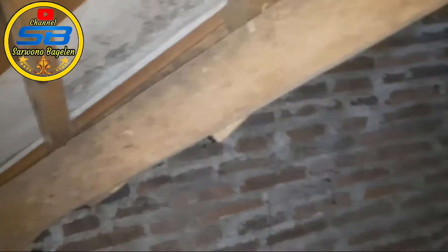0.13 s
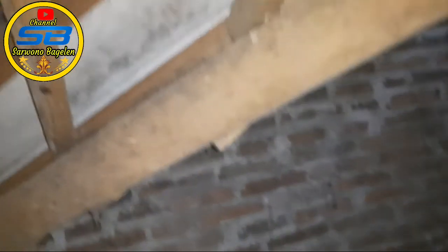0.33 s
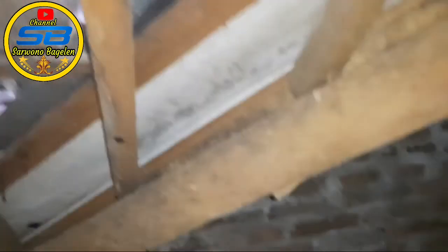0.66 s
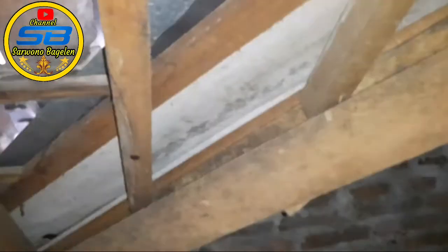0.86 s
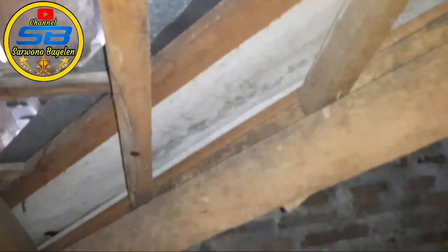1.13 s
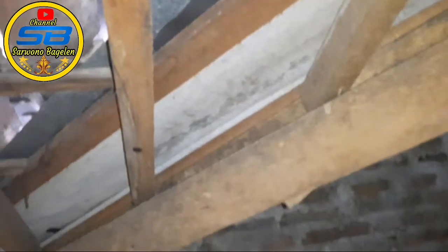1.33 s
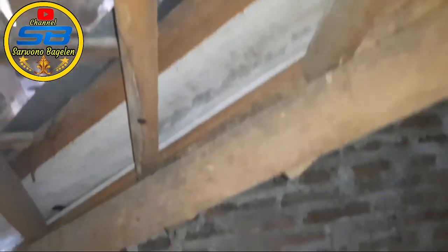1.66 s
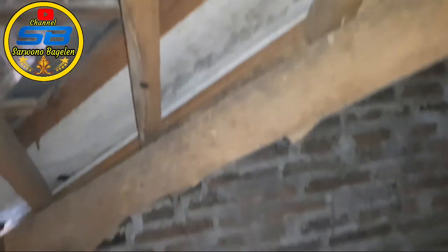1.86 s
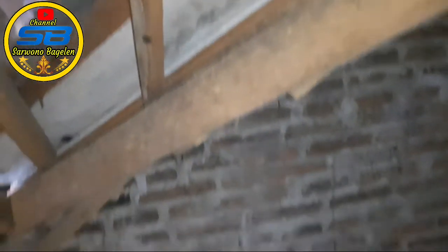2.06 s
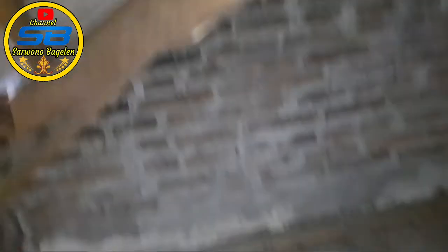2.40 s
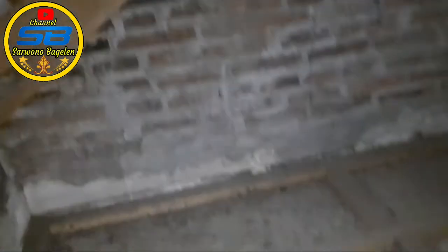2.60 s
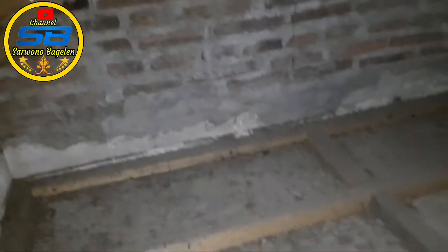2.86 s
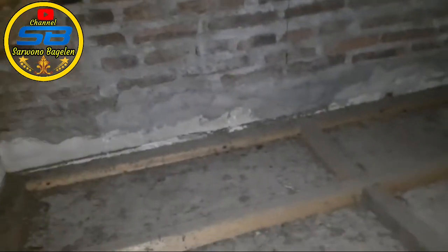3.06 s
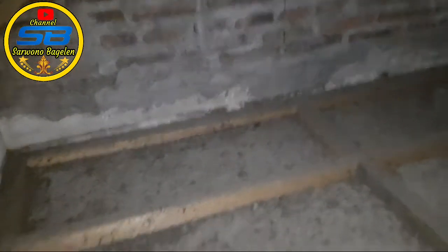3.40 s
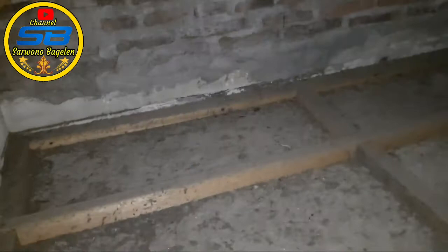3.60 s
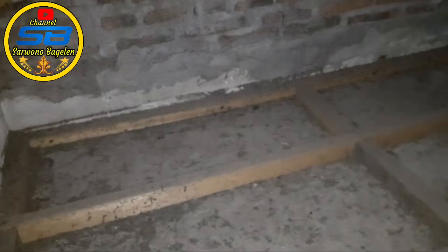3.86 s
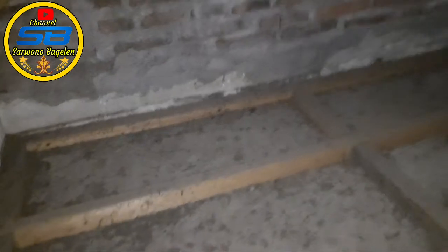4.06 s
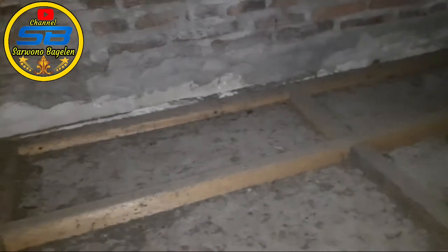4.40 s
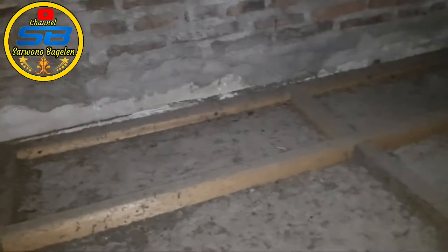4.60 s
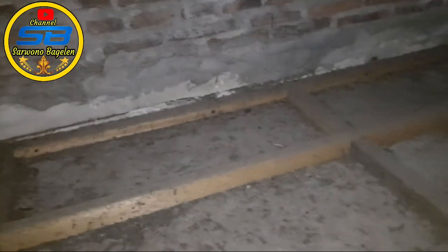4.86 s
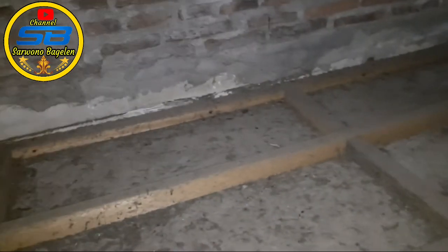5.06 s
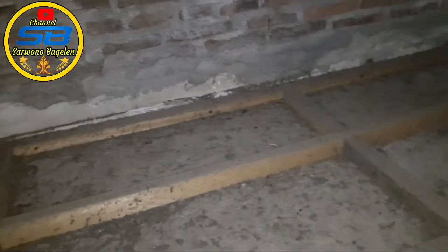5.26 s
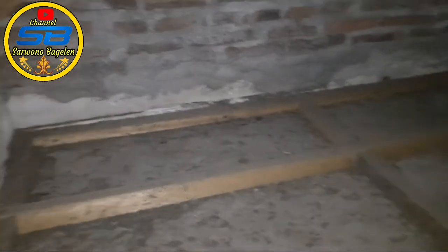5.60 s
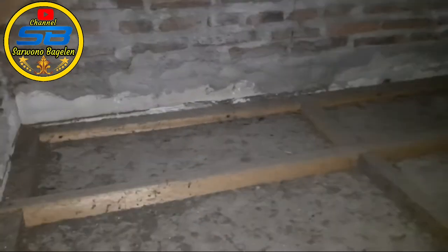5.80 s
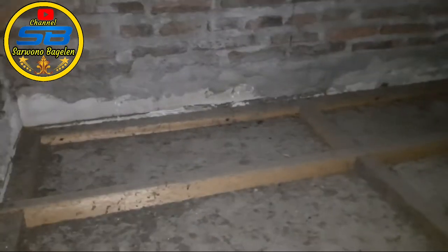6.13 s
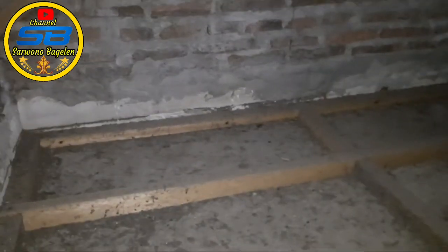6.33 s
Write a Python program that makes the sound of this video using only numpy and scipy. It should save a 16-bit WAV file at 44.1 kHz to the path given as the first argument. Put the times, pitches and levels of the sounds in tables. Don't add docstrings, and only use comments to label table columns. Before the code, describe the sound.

Overlapping thin kitten mews and squeaks under a roof, faint chicks outside, someone shifting on joists, and a single loud crack against the recorder.

```python
import sys
import numpy as np
from scipy import signal
from scipy.fft import rfft, irfft, next_fast_len
from scipy.io import wavfile

SR = 44100
rng = np.random.default_rng(int(sys.argv[2]) if len(sys.argv) > 2 else 0)


def unload_audio(sound):
    columns = np.transpose(np.atleast_2d(sound))
    steps = np.round(np.clip(columns, -1, 1) * 32767)
    wavfile.write(sys.argv[1], SR, steps.astype(np.int16))


def voltage_ratio(decibels):
    exponent = np.asarray(decibels, float) / 20
    return 10 ** exponent


N = 284445


def at_hz(points, hz):
    point_hz, value = np.transpose(points)
    return np.interp(np.log(hz), np.log(point_hz), value)


def drift(rate_hz, size=N):
    r = np.exp(-16 * np.pi * rate_hz / SR)
    settle = 800
    white = rng.standard_normal(size // 8 + settle + 2)
    slow = signal.lfilter([1], [1, -2 * r, r * r], white)[settle:]
    unit = np.sqrt((1 - r * r) ** 3 / (1 + r * r))
    return unit * np.interp(np.arange(size) / 8, np.arange(len(slow)), slow)


def ring(clicks, hz, t60_s):
    r, w = voltage_ratio(-60 / (t60_s * SR)), 2 * np.pi * hz / SR
    return signal.lfilter([0, np.sin(w)], [1, -2 * r * np.cos(w), r * r], clicks + 1e-18)


def pan(db):
    return voltage_ratio(db * np.array([[.5], [-.5]]))


def add(out, start_s, sound, pan_db, lag_ms=0.):
    n = np.arange(sound.shape[1])
    sound = pan(pan_db) * sound * np.clip(np.minimum(n, n[::-1]) / (0.0069 * SR), 0, 1)
    for side, sign in enumerate([.5, -.5]):
        at = round((start_s + .001 + sign * lag_ms / 1000) * SR)
        out[side, at:at + len(n)] += sound[side, :N - at]


def banded_noise(spectrum, patchy_db, grain_db=0.):
    # frequency in Hz, left-right likeness -1 to 1.
    likeness = [(60, 0.97), (240, 0.87), (950, 0.19), (3770, -0.55), (15000, -0.24)]
    # frequency in Hz, L-R level in dB.
    leaning = [(60, -4), (150, -2), (380, -3), (950, 1.5), (2380, -7.5), (5980, -1), (15000, 9.5)]
    points = np.array(spectrum)
    points = points[points[:, 1] > -45]
    low_hz, high_hz = points[0, 0], min(points[-1, 0], 19000)
    edges = low_hz * 2 ** np.arange(0, np.log2(high_hz / low_hz) + .3, .5)
    white = rng.standard_normal((2, 2, N), dtype=np.float32)
    white = white * voltage_ratio(grain_db * drift(300))
    out, together = 0, drift(5.54)
    for k, (low, high) in enumerate(zip(edges, edges[1:])):
        band = signal.butter(2, [low, high], "band", fs=SR, output="sos")
        mid, side = signal.sosfilt(band, white[k % 2])
        hz = np.sqrt(low * high)
        alike = np.clip(at_hz(likeness, hz), 0, 1)
        gain = voltage_ratio(at_hz(spectrum, hz) + patchy_db * (1.43 * together + drift(12.5)))
        pair = np.sqrt(1 + alike) * mid + np.sqrt(1 - alike) * side * [[1], [-1]]
        out = out + gain * pan(at_hz(leaning, hz)) * pair
    return out / np.std(out.mean(axis=0))


def strokes(rows):
    rise_db_per_s, die_db_per_s = 284.5, 181
    s, length, *levels = np.transpose(rows)[:, :, None]
    t = np.arange(0, N + 64, 64) / SR
    shape_db = -rise_db_per_s * np.maximum(s - t, 0) - die_db_per_s * np.maximum(t - s - length, 0)
    gains = [np.sqrt(np.sum(voltage_ratio(level + shape_db) ** 2, axis=0)) for level in levels]
    return [np.interp(np.arange(N) / SR, t, gain) for gain in gains]


def voiced(rows, hoarse, blur_hz):
    s, hz, *levels = np.transpose(rows)
    t = np.arange(s[0], s[-1], 1 / SR)
    pitch = np.interp(t, s, hz) * (1 + 0.0016 * drift(31, size=len(t)))
    hoarse = np.clip(hoarse, 0, 1)
    random = drift(blur_hz, size=len(t)) + 1j * drift(blur_hz, size=len(t))
    flutter = np.sqrt(1 - hoarse) + np.sqrt(hoarse / 2) * random
    phase = 2 * np.pi * np.cumsum(pitch) / SR
    return phase, [np.interp(t, s, v) for v in levels], flutter * np.sqrt(2)


def fading(size, depth):
    waver = [drift(12, size=size) + 1j * drift(12, size=size) for side in range(2)]
    return (1 + depth * np.array(waver)) / np.sqrt(1 + 2 * depth ** 2)


def shifting_weight():
    # time in seconds, level in dB.
    shifting = [(0.0, -56), (0.54, -56.5), (0.92, -52.5), (1.51, -60.5), (1.69, -60), (1.9, -55),
                (2.77, -61), (3.07, -61), (3.34, -64.5), (3.52, -66.5), (3.75, -73.5), (3.95, -62),
                (4.37, -63), (4.72, -60.5), (5.48, -62.5), (5.86, -60), (6.07, -65), (6.45, -60)]
    s, level_db = np.transpose(shifting)
    return np.interp(np.arange(N) / SR, s, level_db)


def scuff_strokes():
    # start in seconds, length in seconds, body in dB, grit in dB, dust over the grit in dB.
    contacts = [(0.243, 0.19, -61.5, -71.5, -7.5), (1.011, 0.065, -53.5, -75.5, -0.5),
                (1.275, 0.098, -55.5, -83.5, -1), (1.695, 0.03, -60.5, -106, -9),
                (1.949, 0.074, -63, -64.5, -6), (2.08, 0.35, -58, -68, -15), (2.633, 0.0092, -57.5, -91, 1),
                (2.799, 0.039, -62.5, -80.5, -22), (3.478, 0.22, -73.5, -80.5, -16),
                (3.754, 0.28, -63.5, -79.5, -1.5), (4.431, 0.16, -71, -78, -16),
                (4.816, 0.076, -67, -70.5, -15), (5.04, 0.038, -69, -93.5, 8),
                (5.395, 0.051, -70, -82, 2.5), (5.6, 0.035, -72, -88.5, -18), (5.87, .03, -93, -96, -13.5),
                (6.402, 0.055, -80, -90, -17)]
    return strokes([(s, length_s, body_db, grit_db, grit_db + dust_db)
                    for s, length_s, body_db, grit_db, dust_db in contacts])


def joist_rumble(weight_db, body):
    # frequency in Hz, density in dB per Hz.
    boom = [(18, -39), (30, -12), (97, 1), (185, -13.5), (227, -18), (260, -10.5), (407, -34), (461, -28),
            (767, -53.5), (1200, -44), (1560, -76), (2640, -120)]
    return np.hypot(voltage_ratio(weight_db + 4.0), body) * banded_noise(boom, patchy_db=2.5)


def recorder_hiss():
    # frequency in Hz, density in dB per Hz.
    self_noise = [(530, -35), (900, -6.5), (1400, -3.5), (2230, -8.5), (3160, -8.5), (6180, -8.5),
                  (8030, -9.5), (9270, -9), (10600, -9.5), (14600, -12), (15700, -17)]
    return voltage_ratio(-82.5) * banded_noise(self_noise, patchy_db=.3)


def kittens():
    # time in seconds, pitch in Hz, effort in dB, mouth opening 0-1.
    long_mew = [(0.0, 791, -63, 0.48), (0.17, 802.7, -62, 0.5), (0.19, 784, -71.5, 0.45),
                (0.3, 750.6, -62.5, 0.49), (0.41, 790.5, -60.5, .55), (0.435, 815, -66, 0.41),
                (0.535, 834, -67.5, 0.4), (.555, 874, -64, 0.58), (0.645, 876, -66, 0.64)]
    long_mew_again = [(0.655, 908, -55.5, 0.41), (.7, 896, -59.5, 0.42), (0.76, 857, -60, 0.54),
                      (.81, 886.5, -56.5, 0.48), (0.858, 903, -53, 0.43), (.91, 910, -55, 0.57),
                      (0.968, 896, -58, 0.42), (1.0, 853, -53.5, 0.73)]
    high_mew = [(0.262, 1570, -80, 0.66), (0.285, 1695, -65.5, 0.88), (0.308, 1762, -61.5, 0.87),
                (0.345, 1774, -61, 0.87), (0.381, 1742, -61, 0.88), (.43, 1520, -62, 0.7),
                (0.485, 1320, -64.5, 0.63), (.56, 1153, -70, 0.5), (0.659, 971, -66.5, 0.13)]
    flat_mew = [(3.33, 976, -87, 0.67), (3.412, 1103, -77, 0.49), (3.61, 1110, -64, 0.33),
                (3.662, 1095, -60.5, 0.31), (3.89, 988, -61.5, 0.27)]
    arch_mew = [(3.53, 587, -88, 0.3), (3.601, 737, -73.5, 0.6), (3.651, 820.5, -68.5, 0.47),
                (3.71, 839, -67, 0.64), (3.77, 800, -60, 0.52), (3.82, 737, -61, 0.52),
                (3.86, 645, -69, 0.4), (3.9, 588, -81, 0.47)]
    rising_mew = [(4.38, 1024, -80.5, 0.4), (4.416, 1054, -77, 0.41), (4.46, 1225, -79.5, 0.83),
                  (4.5, 1220, -68.5, 0.52), (4.545, 1279, -71.5, 0.75), (4.6, 1290, -64, 0.57),
                  (4.651, 1302, -64.5, 0.54), (4.72, 1190, -73, 0.59), (4.799, 1108, -80, 0.7)]
    falling_mew = [(4.53, 702, -78, 0.47), (4.575, 807, -68.5, 0.28), (4.642, 784.5, -59, 0.5),
                   (4.716, 756.4, -62.5, 0.62), (4.775, 737, -59, 0.6), (4.87, 646, -63, 0.71),
                   (4.92, 574, -66.5, 0.51), (4.969, 552.5, -66.5, 0.24), (5.02, 487, -72.5, 0.15)]
    over_mew = [(1.93, 1165, -77.5, 0.49), (1.97, 1300, -74, 0.5), (2.03, 1474, -63.5, 0.61),
                (2.082, 1462, -73, 0.7), (2.132, 1383, -61, 0.61), (2.19, 1392, -74.5, 0.73),
                (2.244, 1364, -62.5, 0.56), (2.3, 1345, -64, 0.55)]
    long_mew_end = [(1.001, 816, -56.5, 0.47), (1.03, 825, -56, 0.4), (1.065, 826, -61, 0.56),
                    (1.099, 856, -60.5, 0.67), (1.14, 821, -62, .5), (1.16, 814.5, -60, 0.41),
                    (1.215, 799.6, -63, 0.59), (1.26, 746, -69, 0.42), (1.31, 600, -88, 0.1)]
    # the same, then edge of the strained upper partials in dB.
    loud_mew = [(1.861, 619, -75.5, 0.29, -98), (1.924, 947, -63, 0.69, -78.5),
                (1.978, 1093, -47.5, 0.9, -67), (2.016, 1132, -54.5, 0.65, -63),
                (2.07, 1117, -52.5, 0.58, -66.5), (2.147, 1024, -42.5, 0.41, -79),
                (2.216, 941, -52.5, 0.34, -70), (2.28, 831, -60.5, 0.27, -82), (2.36, 687, -68, 0.07, -90)]
    mews = [long_mew, long_mew_again, high_mew, loud_mew, flat_mew, arch_mew, rising_mew, falling_mew,
            over_mew, long_mew_end]
    # mouth resonance sharpness, fall per partial in dB, wall echo lag in ms, echo share 0-1.
    throats = [(3.86, -7, 6.05, 0.31), (1.97, -1.5, 6.06, 0.19), (3.9, -4.5, 5.1, 0.33),
               (4.83, -3.5, 5.1, 0), (1.6, -4, 4.5, 0.36), (2.86, -2.5, 5.8, 0.44), (2.06, -4.5, 6.4, 0),
               (1.95, -2, 4.8, 0.18), (1.9, -1, 5.14, 0.24), (2.36, -2, 9.3, 0.24)]
    # hoarse share 0-1, partial 4 re effort in dB, fall per higher partial in dB, L-R in dB,
    # left lag in ms.
    voices = [(.05, -41, -8, -3, -.2), (.05, -41, -8, -3, -.2), (.05, -19, -2, -6, -.2),
              (.02, 0, -6.5, -4, -.14), (.08, -32, -8, 1, -.18), (.06, -29, -8, -1, -.2),
              (.14, -30, -8, -1, -.1), (.06, -22, -16, -4, -.2), (.15, -3, -1, 2, -.1),
              (.05, -41, -8, -3, -.2)]
    # sound bypassing the mouth resonance in dB, wavering of the path 0-1.
    paths = [(-10, 0.4), (-20, 0.32), (-14.5, 0.38), (2.5, 0.37), (-12, 0.74), (-21, 0.51), (-12, 0.66),
             (-10, 0.49), (-9.5, .34), (-12, 0.37)]
    break_up_s = [.02, .005, .07, .07, .07, .07, .07, .07, .07, .07]
    # frequency in Hz, mouth colour on the upper partials in dB.
    mouth_colour = [(2000, 0), (4500, 5), (5300, 2), (5700, 8), (6600, -7), (7200, 1), (8800, 5),
                    (10200, -15), (15000, -24)]
    shut_hz, mouth_octaves = 1000, 2

    out = np.zeros((2, N))
    for rows, throat, voice, path, break_s in zip(mews, throats, voices, paths, break_up_s):
        sharp, slope_db, echo_ms, echo = throat
        hoarse, fourth_db, fall_db, pan_db, lag_ms = voice
        bypass_db, waver = path
        phase, (effort_db, mouth, *edge_db), flutter = voiced(rows, hoarse, blur_hz=107)
        breathy = voiced(rows, hoarse=.15, blur_hz=170)[2]
        breath = voiced(rows, hoarse=1, blur_hz=200)[2]
        spent = np.clip(1 - np.arange(len(phase))[::-1] / (break_s * SR), 0, 1)
        flutter = (1 - spent) * flutter + .7 * spent * breath
        pitch = np.gradient(phase) * SR / (2 * np.pi)

        resonance_hz = shut_hz * 2 ** (mouth_octaves * mouth)
        over = [k * pitch / resonance_hz for k in (1, 2, 3)]
        tract = [20 * np.log10(1 / ((1 - r ** 2) ** 2 + (r / sharp) ** 2) + voltage_ratio(bypass_db)) for r in over]
        levels = [effort_db + k * slope_db + tract[k] - tract[0] for k in range(3)]
        effort = np.maximum(levels[1] - 6, levels[2])
        bloom = effort.max() + 1.3 * (effort - effort.max()) + 22 * (mouth - mouth.max())
        bloom = edge_db[0] if edge_db else bloom
        levels += [bloom + fourth_db + k * fall_db + at_hz(mouth_colour, (k + 4) * pitch) for k in range(6)]

        partials = []
        for k, level in enumerate(levels):
            echo_turn = np.exp(-2j * np.pi * (k + 1) * pitch * echo_ms / 1000)
            wall = (1 + echo * echo_turn) / np.sqrt(1 + echo ** 2)
            line = voltage_ratio(level) * wall * np.exp(1j * (k + 1) * phase)
            partials.append(line * fading(len(phase), depth=waver * (1 + (k > 2))))
        sound = flutter * sum(partials[:3]) + breathy * sum(partials[3:])
        add(out, rows[0][0], sound.real, pan_db, lag_ms)
    return out


def squeaks():
    # start in seconds, length in seconds, first Hz, last Hz, peak in dB.
    glides = [(0.215, .07, 3300, 4500, -61), (2.606, 0.26, 3320, 3190, -64), (2.84, 0.29, 2150, 2230, -58),
              (2.86, 0.165, 1190, 1330, -65), (3.043, 0.3, 2770, 2711, -64), (3.17, 0.34, 2560, 2278, -61),
              (6.29, 0.16, 1900, 2150, -63), (1.28, 0.085, 3540, 3560, -78),
              (1.705, 0.075, 2370, 2280, -85), (1.24, .06, 770, 620, -60), (1.27, .14, 1050, 1150, -64),
              (2.31, .28, 2910, 2828, -62), (3.486, 0.17, 3160, 3630, -71.5),
              (3.634, 0.28, 3620, 3090, -75), (6.18, .14, 2245, 1930, -72.5), (2.0, .4, 490, 500, -55),
              (5.501, .23, 2000, 1834, -81), (3.75, .3, 265, 282, -57), (1.27, .14, 2330, 2280, -72),
              (2.785, .24, 1850, 1880, -76), (3.9, .21, 1660, 1620, -66), (3.92, .13, 930, 1000, -71),
              (4.19, .12, 510, 520, -68), (4.44, .08, 3680, 3710, -74), (4.575, .06, 3980, 4010, -74),
              (5.46, .19, 3900, 3950, -78), (5.92, .11, 3980, 3950, -76), (5.44, .27, 2250, 2200, -78),
              (2.33, .12, 1800, 1790, -71), (1.91, .1, 3300, 4300, -66.5), (2.1, .2, 3900, 3900, -67.5),
              (3.03, 0.1, 3150, 3600, -78), (3.102, .056, 2790, 2780, -58), (3.174, .04, 2770, 2740, -58),
              (2.92, .05, 3850, 3830, -73), (3.22, .2, 2350, 2050, -67), (3.2, .16, 2750, 2600, -64)]
    # hoarse share 0-1, blur in Hz, L-R in dB, share of the length before the peak.
    colours = [(0.5, 97, -7, 0.45), (0.3, 92, -7, 0.17), (0.41, 86, -7, 0.35), (0.98, 78, -2.5, 0.38),
               (0.63, 70, -5, 0.29), (0.93, 93, -7, 0.26), (0.26, 84, -7.5, 0.65), (.71, 87, -10, 0.68),
               (0.4, 77, -15, 0.31), (0.3, 79, -1, 0.44), (1, 130, 4, 0.74), (0.5, 34, 0, 0.1),
               (0.87, 190, -8, 0.3), (.5, 70, -18, 0.091), (0.98, 150, -12.5, 0.4), (1, 120, 2.5, 0.51),
               (1, 450, -6, 0.37), (0.98, 19, 2, 0.3), (0.5, 78, 2, 0.26), (0.4, 67, -8, 0.24),
               (0.8, 120, -10, 0.24), (1, 120, -2, 0.4), (0.75, 66, -3, 0.52), (0.2, 66, -8, 0.31),
               (0.53, 65, -5, 0.42), (1, 330, -8.5, .2), (1, 160, -6, 0.28), (1, 170, -2, 0.42),
               (.7, 70, -12.5, 0.32), (.9, 250, 0, .5), (0.83, 200, -2, 0.62), (.6, 80, -6, 0.51),
               (0.03, 50, -2, 0.32), (0.1, 60, -3, 0.17), (.4, 60, -12, 0.34), (1, 92, 0, 0.45),
               (0.92, 88, -2, 0.29)]
    swell_range_db, fade_range_db = 15, 12
    out = np.zeros((2, N))
    for (s, length_s, first_hz, last_hz, peak_db), (hoarse, blur_hz, pan_db, share) in zip(glides, colours):
        share = np.clip(share, .05, .95)
        rows = [(0, first_hz, -swell_range_db * share),
                (share * length_s, first_hz + share * (last_hz - first_hz), 0),
                (length_s, last_hz, -fade_range_db * (1 - share))]
        phase, (swell_db,), flutter = voiced(rows, hoarse, blur_hz)
        line = voltage_ratio(peak_db + 2 * swell_db) * flutter * np.exp(1j * phase)
        add(out, s, (line * fading(len(phase), depth=0.056)).real, pan_db)
    return out


def scuffs(weight_db, body, gritty, dusty):
    # frequency in Hz, density in dB per Hz.
    woody = [(250, 4.5), (450, 2), (640, -5), (900, -21), (1300, -23.5), (2000, -16.5), (3000, -32.5)]
    grit_spectrum = [(2500, -1.5), (3800, 0), (5500, -6), (7000, 5.5), (8500, -14.5)]
    dust_spectrum = [(6500, 0), (9500, 12), (11500, -3), (14000, -17), (16000, -13)]
    settled_db = -100
    creak = voltage_ratio(-69 + 1.35 * (weight_db - weight_db.mean()))
    wood = np.hypot(creak, body) * banded_noise(woody, patchy_db=2.5, grain_db=0.5)
    grit = (gritty + voltage_ratio(settled_db)) * banded_noise(grit_spectrum, patchy_db=1., grain_db=2.)
    dust = (dusty + voltage_ratio(settled_db)) * banded_noise(dust_spectrum, patchy_db=1., grain_db=2.)
    return wood + grit + dust


def ticks():
    # time in seconds, peak in dB, ring in Hz, L-R in dB.
    tick_events = [(0.429, -51.5, 1700, -30), (2.654, -70.5, 3300, -50), (3.75, -48.5, 2150, -17),
                   (3.82, -67, 1700, -3), (.32, -72, 9700, -5), (.525, -73, 9700, -5), (.628, -74, 9700, 3),
                   (.695, -66, 3100, -9), (3.857, -46, 900, 5), (3.751, -62, 12500, -10),
                   (4.2, -63.5, 12500, -5), (1.669, -61, 680, -3), (0.37, -58, 3100, -10),
                   (3.875, -38.5, 500, -1.0), (3.915, -43.5, 511, -3), (3.944, -46.5, 500, -6),
                   (4.7563, -36, 1300, -8),
    ]
    out = np.zeros((2, N))
    click = np.eye(1, 900)[0]
    decay = np.exp(-np.arange(len(click)) / (0.0014 * SR))
    soft = signal.butter(2, 7000, fs=SR, output="sos")
    for s, level_db, hz, pan_db in tick_events:
        snap = signal.sosfilt(soft, rng.standard_normal(len(click)) * decay)
        snap_share = 0.4 * (level_db < -39)
        at = round(s * SR)
        tick = ring(click, hz, 0.014) + snap_share * snap
        out[:, at:at + len(click)] += voltage_ratio(level_db) * pan(pan_db) * tick
    return out


def foot_drag():
    # start in seconds, length in seconds, level in dB.
    drags = [
        (1.28, 0.09, -74),
        (2.3, .14, -62.5),
        (3.9, 0.12, -65),
        (4.18, 0.029, -74.5),
        (5.0, 0.016, -85),
    ]
    # frequency in Hz, density in dB per Hz.
    board = [(700, 3), (950, -4), (1200, -2.5), (1700, -2), (2400, -8), (3100, -22)]
    return strokes(drags)[0] * banded_noise(board, patchy_db=1.5, grain_db=3.)


def knock():
    # case mode in Hz, level in dB, t60 in seconds.
    case_modes = [(4400, -30, .003), (500, -21, .014), (2500, -28, .004), (6300, -28, .003),
                  (10500, -37, .002), (13600, -37, .002)]
    knock_s, lead_s, crack_db, thump_db = 2.59413, .004, -7.3, -8
    t = np.arange(4000) / SR - lead_s
    after = np.maximum(t, 1e-9)
    spike = .8 * np.exp(-np.abs(t) / .00011)
    loading = .22 * np.exp(t / .0008) * (t < 0) - .07 * np.exp(-((t + .0022) / .0008) ** 2)
    crack = -voltage_ratio(crack_db) * (spike + loading)
    click = 1. * (np.arange(len(t)) == round(lead_s * SR))
    case = sum(voltage_ratio(level_db) * ring(click, hz, t60_s) for hz, level_db, t60_s in case_modes)
    bend = np.cos(np.pi * np.log(after / .0043) / .66)
    thump = bend * (1 - np.exp(-after / .003)) * np.exp(-after / .0064)
    out, at = np.zeros((2, N)), round((knock_s - lead_s) * SR)
    out[:, at:at + len(t)] = (crack + case + voltage_ratio(thump_db) * thump) * voltage_ratio([[-42], [0]])
    return out


def chicks():
    # start in seconds, level in dB, first Hz, last Hz, length in seconds.
    cheeps = [(2.689, -74, 5460, 4630, .03), (2.789, -65, 5730, 3760, 0.021),
              (2.916, -69.5, 5540, 3560, 0.026), (3.548, -72.5, 4160, 3160, 0.035),
              (4.232, -76, 4150, 2970, 0.046), (4.405, -76, 5600, 3660, 0.077),
              (4.54, -77, 5530, 3500, 0.053), (4.676, -69, 4260, 3790, 0.022),
              (4.77, -65.5, 4380, 3080, 0.036), (5.39, -67, 4304, 2910, 0.037),
              (5.867, -68.5, 4190, 2950, 0.038), (6.378, -71, 4390, 3110, 0.067)]
    # lag in seconds, loss in dB.
    yard_echoes = [
        (0, 3),
        (.017, 6),
        (.039, 10),
    ]
    out = np.zeros((2, N))
    for s, level_db, first_hz, last_hz, length_s in cheeps:
        rows = [(0, first_hz * .95, -8),
                (.2 * length_s, first_hz * .95, 2),
                (.5 * length_s, first_hz * .92, 0),
                (.8 * length_s, last_hz, -1),
                (1.3 * length_s, last_hz * .96, -8)]
        phase, (fall_db,), flutter = voiced(rows, hoarse=1, blur_hz=400)
        for lag_s, loss_db in yard_echoes:
            line = voltage_ratio(level_db + fall_db - loss_db) * flutter * np.exp(1j * phase)
            add(out, s + lag_s, (line * fading(len(phase), depth=.4)).real, -6)
    return out


def roof_space(x):
    t60_s, dull_hz = 0.23, 5070
    size = next_fast_len(N + SR)
    hz = np.arange(size // 2 + 1) * SR / size
    t60_at_hz = t60_s / (1 + (hz / dull_hz) ** 2)
    lags_s = rng.uniform(.006, .04, (2, 8))
    heard = rfft(x, size)
    for side in range(2):
        loops = [voltage_ratio(-60 * lag / t60_at_hz) * np.exp(-2j * np.pi * hz * lag) for lag in lags_s[side]]
        heard[side] *= sum((-1) ** k * g / (1 - g) for k, g in enumerate(loops))
    return irfft(heard, size)[:, :N]


def scene():
    weight_db = shifting_weight()
    body, gritty, dusty = scuff_strokes()
    near, far, small = kittens(), squeaks() + chicks(), ticks()
    room = roof_space(voltage_ratio(-10.0) * near + voltage_ratio(-6.5) * far + voltage_ratio(-11.5) * small)
    voices = voltage_ratio(4.0) * near + voltage_ratio(-4.0) * far
    movement = joist_rumble(weight_db, body) + scuffs(weight_db, body, gritty, dusty) + foot_drag() + small
    return voices + room + movement + recorder_hiss() + knock()


def top_cut(x):
    return signal.sosfilt(signal.butter(12, 15500, fs=SR, output="sos"), x)


def record(dry):
    # centre in Hz, width in Hz, share added.
    port_colour = [
        (7840, 1300, -0.39),
        (9400, 590, 0.45),
    ]
    ports = signal.sosfilt(signal.butter(4, 38, "high", fs=SR, output="sos"), dry)
    for hz, width_hz, share in port_colour:
        ports = ports + share * signal.lfilter(*signal.iirpeak(hz, hz / width_hz, fs=SR), ports)
    return top_cut(ports)


dry = scene()
out = record(dry)
unload_audio(out)
```